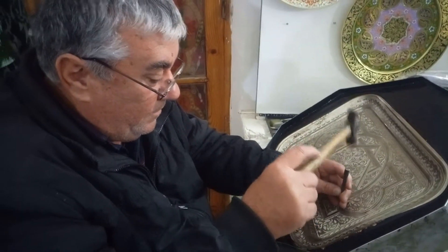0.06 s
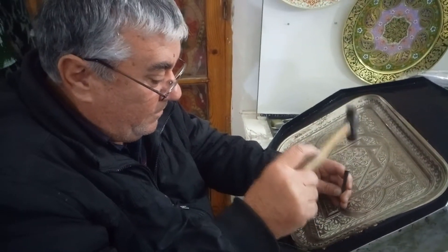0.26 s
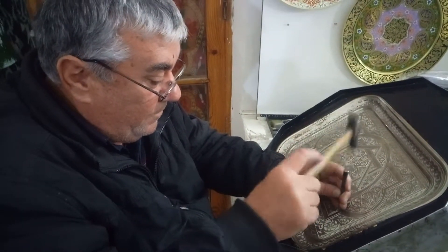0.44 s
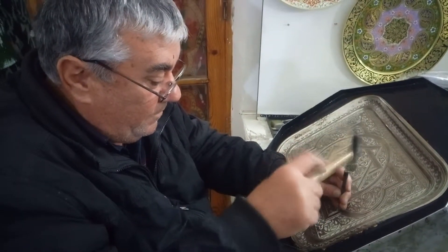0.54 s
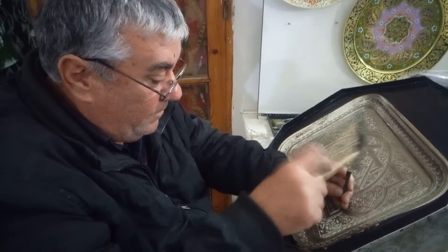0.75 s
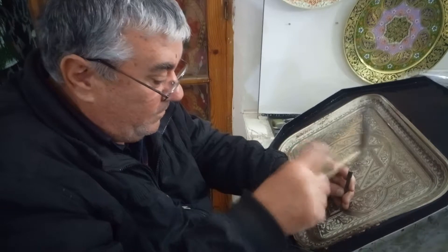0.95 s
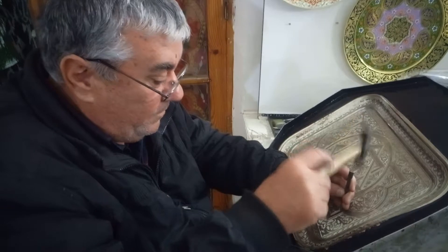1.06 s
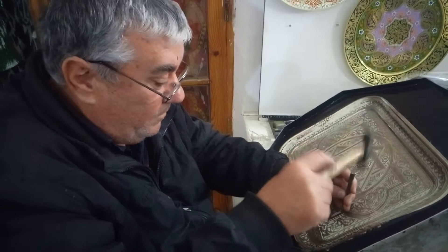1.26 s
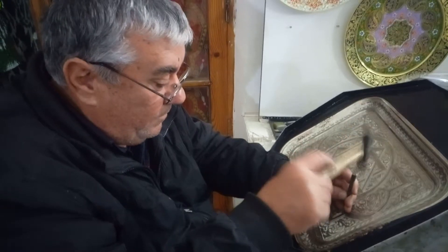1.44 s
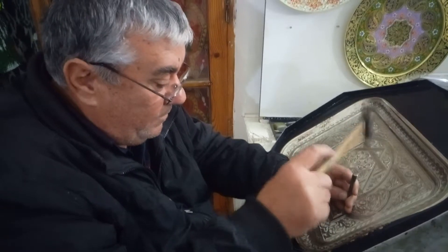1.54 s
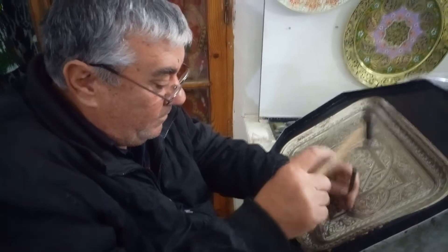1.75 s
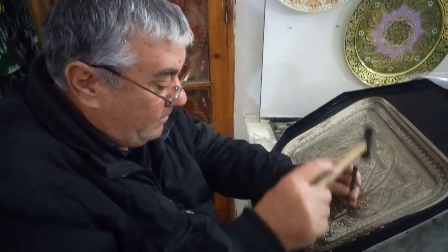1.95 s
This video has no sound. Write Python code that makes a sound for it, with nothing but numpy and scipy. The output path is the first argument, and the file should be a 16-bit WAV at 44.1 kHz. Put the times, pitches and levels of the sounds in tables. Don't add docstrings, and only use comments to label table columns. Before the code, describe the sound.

Small hammer tapping a steel punch on a metal tray, seven even taps in a hard-walled workshop

```python
import sys
import numpy as np
from scipy import signal
from scipy.fft import rfft, irfft
from scipy.io import wavfile
from scipy.ndimage import uniform_filter1d

SR = 44100
rng = np.random.default_rng(int(sys.argv[2]) if len(sys.argv) > 2 else 0)


def volts_from_db(level):
    exponent = np.asarray(level, float) / 20
    return 10 ** exponent


def dump(signal):
    limited = np.clip(np.atleast_2d(signal).T, -1, 1)
    pcm = np.round(limited * 32767).astype(np.int16)
    wavfile.write(sys.argv[1], SR, pcm)


N = 88200

# frequency in Hz, level in dB.
STREET_COLOUR = [(30, -6.5), (100, 6), (430, -11.5), (950, -15.5), (1300, -34.5), (2700, -19), (3500, -42),
                 (16000, -63.5)]
STREET_DB = -46
# centre in Hz, width in Hz, level in dB.
HISS = [(6200, 500, -83), (14950, 1600, -82)]

# start in seconds, level in dB, frequency in Hz, length in seconds.
KNOCKS = [
    (.04, -41.5, 111, 0.015),
    (0.336, -45, 75, .04),
    (0.549, -30, 90.5, 0.037),
    (0.821, -32, 65, 0.074),
    (1.027, -35, 76.5, 0.048),
    (1.376, -37, 70, 0.076),
    (1.446, -28.5, 100, 0.042),
    (1.881, -29, 125, 0.0073),
    (1.901, -36.5, 98.5, 0.023),
]
RUMBLE_HZ, RUMBLE_WIDTH_HZ, RUMBLE_DB, RUMBLE_T60_S = 85, 70, -49.5, 1.73

# start in seconds, tray level in dB, tick level in dB, punch level in dB, limiter depth in dB.
TAPS = [
    (0.2163, -31, -31, -22.5, 8.5),
    (0.4217, -26, -31, -24.5, 11),
    (0.641, -23.5, -30.5, -23.5, 12.5),
    (0.8569, -23, -30.5, -24.5, 13.5),
    (1.0727, -22.5, -28.5, -22.5, 11.5),
    (1.2827, -21, -29, -23, 10),
    (1.4819, -20.5, -29, -26, 10),
]
TRAY_DB, TICK_DB, PUNCH_DB = 3, 10, 10

# frequency in Hz, level in dB, t60 in seconds, signed weight.
TIP_PATCHES = [(2145, -5, 0.025, 1), (2990, 3.5, 0.028, -0.91), (3760, -2, 0.045, 0.76),
               (4080, -9, 0.036, -0.86), (4870, 3.5, 0.011, 1), (5790, 8, 0.054, -0.043),
               (6500, -21, .012, -0.64), (7170, 8, 0.004, -1.59), (8000, -4, 0.013, 0.42),
               (8010, 9, 0.0075, -0.54), (8660, -27, 0.0052, -0.7)]
TICK_CHOKE_S = .0045
CHATTER_S, CHATTER_DB = 0.0023, 2.5
CRACK_DB, CRACK_S, CRACK_HZ = 1, 0.0017, 5800
DRIFT = .005

# frequency in Hz, level in dB, t60 in seconds, sign.
PUNCH_MODES = [(5650, -8, .2, 1), (12200, -17, .03, 1), (13200, -19, .03, -1), (14600, -4, .04, 1),
               (15050, -9, .03, -1), (15440, 0, .035, 1)]
PUNCH_RISE_S = .0013
SING_HZ, SING_DB, SING_T60_S, SING_WAVER_DB = 12064, -24, .33, 1.5

# frequency in Hz, level in dB, t60 in seconds, signed weight.
TRAY_MODES = [(612, 3, .04, -0.5), (963, -8, 0.031, 0.66), (1496, -6, 0.042, -1.3), (1694, -13, 0.09, 1)]
BEND_HZ, BEND_FROM_HZ, BEND_S, BEND_DB = 825, 1150, .0035, 2
SWELL_S, CHOKE_S, CHOKE_DB = .0088, .003, -19.5
# frequency in Hz, level in dB, t60 in seconds, weight.
LINGER_MODES = [(648.7, -10.5, 0.45, 0.74), (769, -14.5, 0.66, -0.49), (809.5, -9.5, 0.64, 0.93),
                (856.5, -12, 0.92, 0.49), (909.7, -7, 0.64, -0.49), (987, -13, 0.68, 0.49),
                (1035, -14, 1, -0.16), (1173, -17, 0.65, 0.94)]
LINGER_RISE_S = 0.081
# frequency in Hz, level in dB, t60 in seconds, signed weight.
WOOD_MODES = [(150.1, -3.5, 0.49, 0.61), (342.8, -10, 0.54, -0.98), (524.4, -16, 0.49, 0.98)]

# delay in seconds, level in dB, lowest Hz, highest Hz.
ECHOES = [(.0052, -12, 2000, 17000), (.0135, -10, 400, 2000), (.029, -20, 4500, 17000),
          (.0454, -15, 12000, 17000)]
# frequency in Hz, t60 in seconds.
ROOM_T60 = [(60, 0.5), (900, 0.91), (3000, 0.69), (7000, 0.36), (15000, 0.25)]
# frequency in Hz, level in dB per Hz.
ROOM_TRAY = [(400, -20), (600, 1), (850, 3.5), (1050, 0), (1400, -8), (1750, -12.5), (2200, -61.5)]
# frequency in Hz, level in dB per Hz.
ROOM_TICK = [(50, 9), (150, 2.5), (400, 4), (1500, -11), (2800, -5.5), (4300, -12.5), (6200, -1),
             (10500, -14)]
# frequency in Hz, level in dB per Hz.
ROOM_PUNCH = [(9000, -46.5), (11000, -37.5), (12100, -18.5), (13800, -9), (14600, -0.5), (15700, -3.5),
              (16100, -32.5), (16800, -47.5)]
# frequency in Hz, level in dB per Hz.
ROOM_SPOT = [(1500, -30), (2350, 0), (3300, -40), (4200, -31), (5000, 1.5), (6000, 1.5), (8000, -9),
             (9000, -26)]
SPOT_DB_PER_TAP = -12.5
ROOM_DB, WALL_S = -3.5, .0365
EARLY_DB, EARLY_LOW_DB, EARLY_HZ = -8, -1, 1500

LOOK_AHEAD_S, HOLD_S, RELEASE_S = 0.022, 0.004, 0.089
TOP_HZ, BASS_CUT_HZ = 15900, 55


def along_hz(table, hz):
    table = np.array(table, float)
    return np.interp(np.log(hz), np.log(table[:, 0]), table[:, 1])


def band(x, hz, width):
    low, high = max(hz - width / 2, 5), min(hz + width / 2, .49 * SR)
    return signal.sosfilt(signal.butter(2, [low, high], "bandpass", fs=SR, output="sos"), x)


def unit(x):
    return x / np.sqrt(np.mean(x ** 2))


def walk(rate):
    hold = int(SR / rate)
    steps = np.repeat(rng.standard_normal(N // hold + 1), hold)
    return unit(uniform_filter1d(steps, hold)[:N])


def decay(t, t60):
    return np.exp(-np.log(1000) * t / t60)


def street_hum():
    street = np.zeros(N)
    for hz in 32 * 2 ** np.arange(0, 9, 1 / 5):
        level_db = along_hz(STREET_COLOUR, hz) + 10 * np.log10(hz) + 2 * walk(50)
        street += volts_from_db(level_db) * unit(band(rng.standard_normal(N), hz, .13 * hz))
    hiss = sum(volts_from_db(db) * unit(band(rng.standard_normal(N), hz, width)) for hz, width, db in HISS)
    return volts_from_db(STREET_DB) * unit(street) + hiss


def bench():
    t = np.arange(N) / SR
    shaken = sum((t > row[0]) * decay(np.maximum(t - row[0], 0), RUMBLE_T60_S) for row in TAPS)
    noise = band(rng.standard_normal(N), RUMBLE_HZ, RUMBLE_WIDTH_HZ)
    noise = band(noise, RUMBLE_HZ, RUMBLE_WIDTH_HZ)
    out = volts_from_db(RUMBLE_DB + 3 * walk(25)) * shaken * unit(noise)
    for at, db, hz, length in KNOCKS:
        lump = np.exp(-((t - at) / (0.31 * length)) ** 2)
        out = out + volts_from_db(db + 2) * lump * np.sin(2 * np.pi * hz * (t - at))
    return out


def ring(modes, detune=np.ones(16)):
    t = np.arange(SR // 2) / SR
    return sum(sign * volts_from_db(db) * np.sin(2 * np.pi * hz * factor * t) * decay(t, t60)
               for (hz, db, t60, sign), factor in zip(modes, detune))


def add(x, piece, at_s):
    i = int(at_s * SR)
    piece = piece[:len(x) - i]
    x[i:i + len(piece)] += piece


def tick(tick_db, wander, shared, own):
    t, since = np.arange(len(shared)) / SR, np.arange(SR // 2) / SR
    envelope = t / CHATTER_S * np.exp(-t / CHATTER_S) / np.sqrt(CHATTER_S * SR)
    rattle = volts_from_db(CHATTER_DB) * (shared + 0.13 * own) * envelope
    rattle[0] += .4
    patches = signal.fftconvolve(ring(TIP_PATCHES, 1 + wander), rattle)[:SR // 2]
    out = volts_from_db(TICK_DB + tick_db) * np.exp(-since / TICK_CHOKE_S) * patches
    crack = band((shared + own) * np.exp(-t / CRACK_S), CRACK_HZ, 1.88 * CRACK_HZ)
    add(out, volts_from_db(CRACK_DB + tick_db) * crack, 0)
    return out


def punch(punch_db, wander):
    rise = np.arange(SR // 2) / SR / PUNCH_RISE_S
    return volts_from_db(PUNCH_DB + punch_db) * rise * np.exp(1 - rise) * ring(PUNCH_MODES, 1 + 0.36 * wander)


def hammer_sing(tick_db, waver):
    return ring([(SING_HZ, SING_DB + 4 + tick_db, SING_T60_S, 1)]) * waver


def tray():
    t = np.arange(SR // 2) / SR
    hz = BEND_HZ + (BEND_FROM_HZ - BEND_HZ) * np.exp(-t / BEND_S)
    swell = np.interp(t, [0, SWELL_S, SWELL_S + CHOKE_S], [.4, 1, volts_from_db(CHOKE_DB)])
    fade = np.exp(-np.maximum(t - SWELL_S, 0) / 0.066)
    bend = volts_from_db(BEND_DB) * np.sin(2 * np.pi * np.cumsum(hz) / SR) * fade
    struck = volts_from_db(TRAY_DB) * swell * (bend + ring(TRAY_MODES))
    return struck + np.minimum(t / LINGER_RISE_S, 1) * ring(LINGER_MODES)


def echoes():
    out, click = np.eye(1, SR // 10)[0], np.eye(1, 600)[0]
    for delay, db, low_hz, high_hz in ECHOES:
        add(out, volts_from_db(db) * band(click, (low_hz + high_hz) / 2, high_hz - low_hz), delay)
    return out


def diffuse(colour):
    t = np.arange(SR) / SR
    spectrum = rfft(rng.standard_normal(SR))
    noise = irfft(spectrum * volts_from_db(along_hz(colour, np.arange(SR // 2 + 1) + 1.)), SR)
    tail = np.zeros(SR)
    for hz in 50 * 2 ** np.arange(0, 8.5, 1 / 3):
        early = volts_from_db(EARLY_DB if hz > EARLY_HZ else EARLY_LOW_DB)
        onset = np.interp(t, [0, .008, WALL_S, WALL_S + 0.00276], [0, early, early, 1])
        tail += onset * band(noise, hz, 0.21 * hz) * decay(t, along_hz(ROOM_T60, hz))
    return volts_from_db(ROOM_DB + 13.5) * tail


def taps():
    near, far = np.zeros(N), np.zeros(N)
    shared = rng.standard_normal(400)
    wanders = np.cumsum(rng.standard_normal((len(TAPS), 16)), axis=0) * DRIFT
    owns = rng.standard_normal((len(TAPS), 400))
    tray_near, wood, waver = tray(), ring(WOOD_MODES), volts_from_db(SING_WAVER_DB * walk(90))
    tray_room, tick_room, punch_room = diffuse(ROOM_TRAY), diffuse(ROOM_TICK), diffuse(ROOM_PUNCH)
    spot_room = diffuse(ROOM_SPOT)
    for k, (at, tray_db, tick_db, punch_db, duck_db) in enumerate(TAPS):
        wander, own = wanders[k], owns[k]
        blow = tick(tick_db, wander, shared, own) + punch(punch_db, wander)
        blow = blow + volts_from_db(tray_db) * tray_near + volts_from_db(tick_db) * wood
        blow = blow + hammer_sing(tick_db, waver[3000 * k:][:SR // 2])
        add(near, volts_from_db(duck_db) * blow, at - .0006)

        slip = np.array([1, 0.39 * own[0], 0.21 * own[1], 0.22 * own[2]])
        wash = volts_from_db(tray_db) * tray_room
        wash = wash + volts_from_db(tick_db) * (tick_room + volts_from_db(k * SPOT_DB_PER_TAP) * spot_room)
        wash = wash + volts_from_db(punch_db) * np.convolve(punch_room, slip)[:SR]
        add(far, volts_from_db(duck_db) * wash, at)
    return signal.fftconvolve(near, echoes())[:N] + far


def scene():
    return (street_hum() + bench() + taps())[None]


def top_cut(x):
    return signal.sosfilt(signal.butter(12, 16970, fs=SR, output="sos"), x)


def record(dry):
    t = np.arange(N) / SR
    corners = [-LOOK_AHEAD_S, 0, HOLD_S, HOLD_S + RELEASE_S]
    duck_db = np.max([np.interp(t - row[0], corners, [0, 1, 1, 0]) * row[-1] for row in TAPS], axis=0)
    x = signal.sosfilt(signal.ellip(7, .5, 55, TOP_HZ, fs=SR, output="sos"), dry * volts_from_db(-duck_db))
    x = signal.lfilter(*signal.butter(2, BASS_CUT_HZ, "high", fs=SR), x)
    return top_cut(x)


dry = scene()
out = record(dry)
dump(out)
```